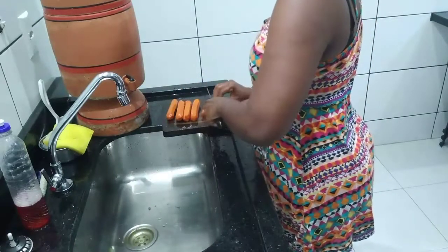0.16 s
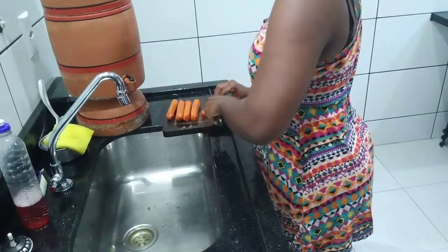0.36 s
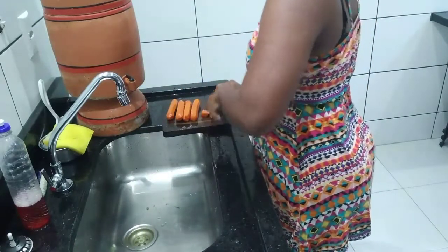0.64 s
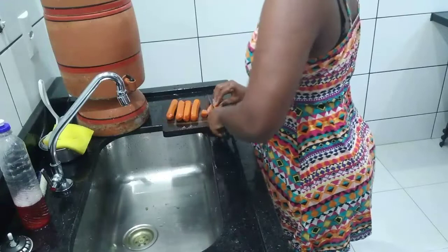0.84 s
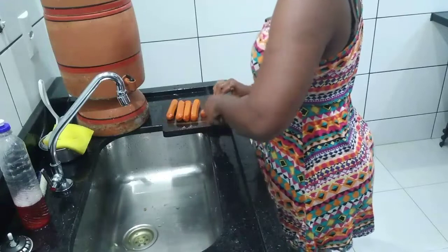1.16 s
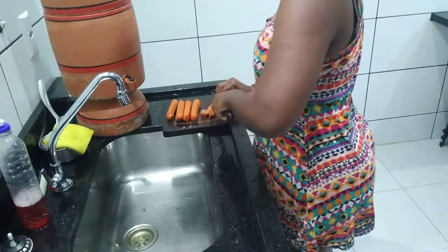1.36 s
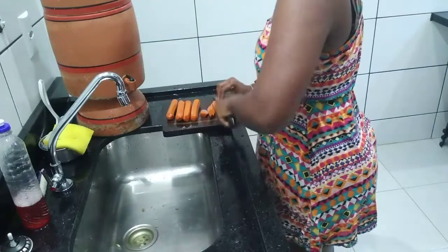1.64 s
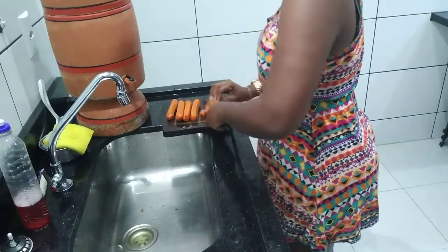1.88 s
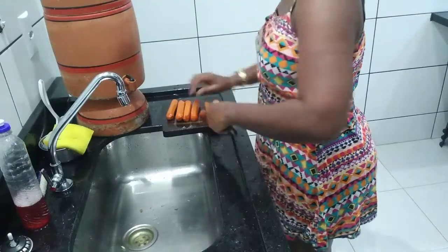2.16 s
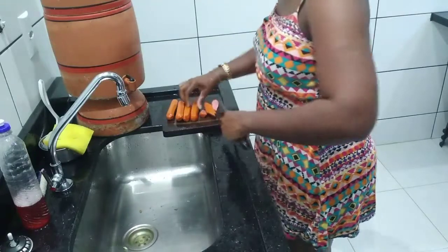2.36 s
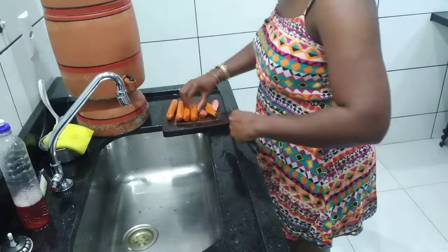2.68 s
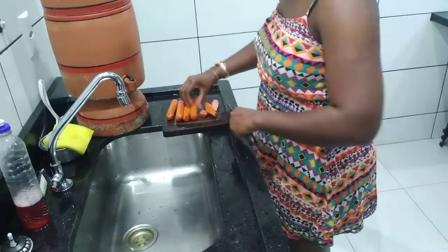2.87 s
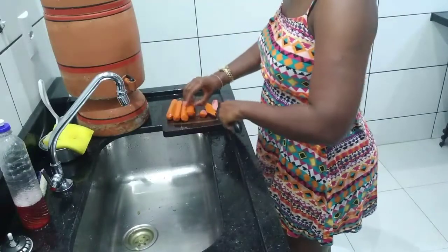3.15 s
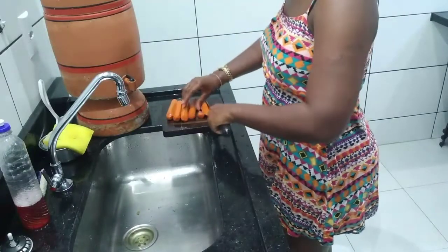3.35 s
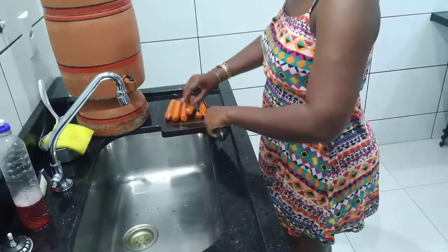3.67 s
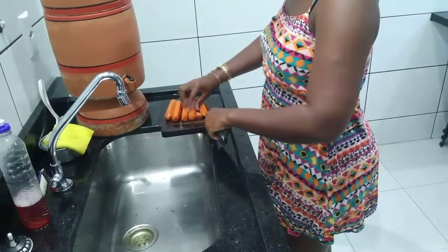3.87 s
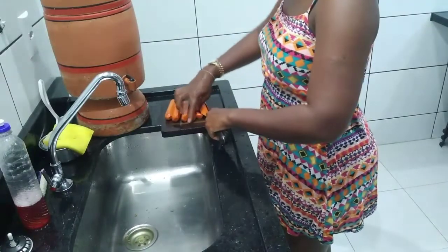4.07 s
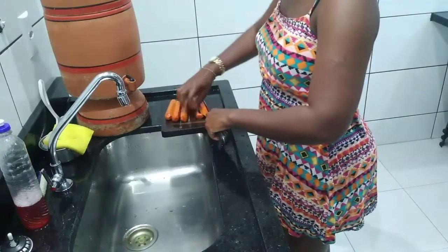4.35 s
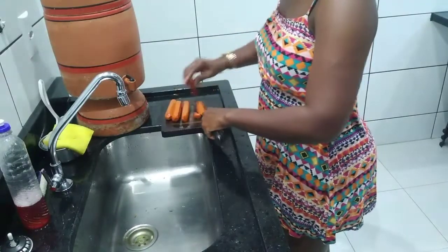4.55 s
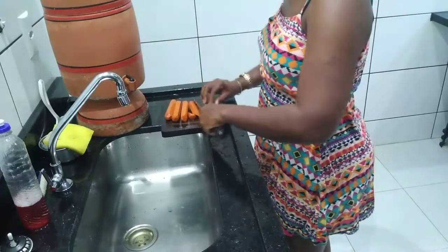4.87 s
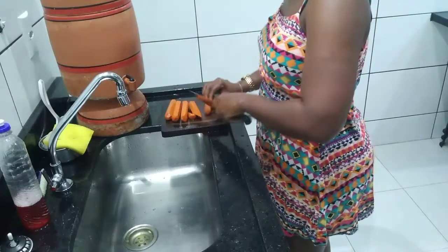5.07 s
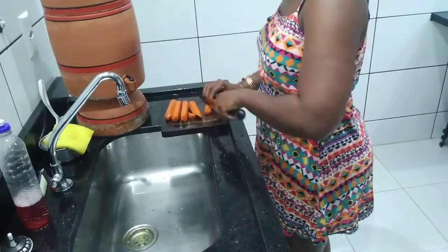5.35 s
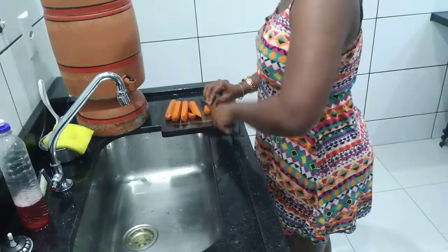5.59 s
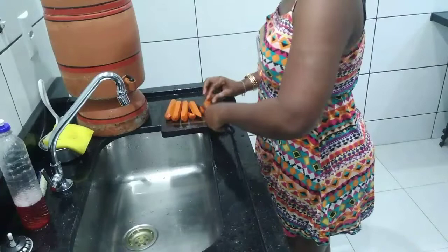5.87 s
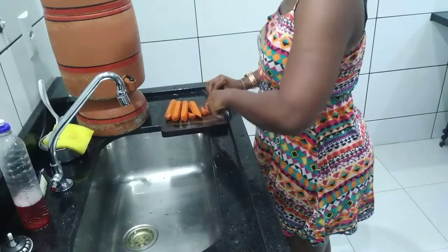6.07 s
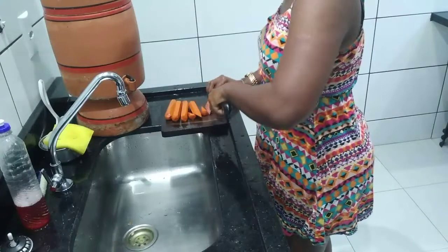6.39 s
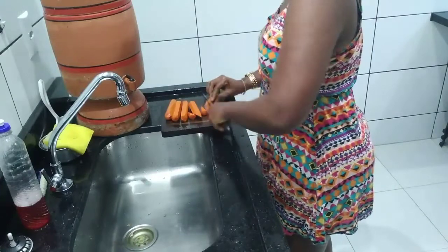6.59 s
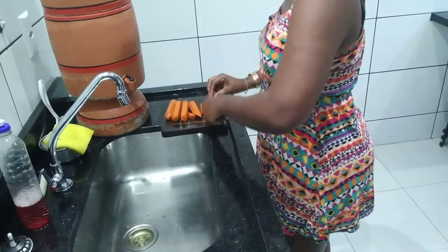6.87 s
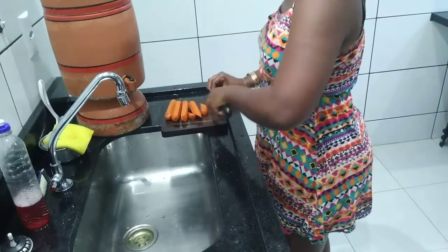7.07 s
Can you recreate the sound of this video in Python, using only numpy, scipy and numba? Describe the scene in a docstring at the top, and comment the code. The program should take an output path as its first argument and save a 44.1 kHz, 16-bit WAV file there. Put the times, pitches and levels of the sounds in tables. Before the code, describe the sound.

A microwave oven runs throughout in a small tiled kitchen: a steady low hum with a prominent midrange fan-blade drone, soft muffled air and hiss, and a faint, unevenly swelling cabinet rumble, stronger on the left. Nearby, a knife meets a cutting board with short, dull, woody knocks. Two quick taps fall around 0.8 seconds, with a weaker thud just after at 0.95. Another tap and a fainter one come at 1.7 to 1.8, with a thin high blade scrape and a brief airy hand swish until about 2.15. Pieces slide with soft, low squeaks from 2.8 to 3.2. Then mostly hum until a short rub at 5.4 and two taps at 5.6. A faint singing scrape starts at 6.2, and a final pair lands near 6.5, its second tap the loudest. The drone strengthens towards 7.2. Phone-microphone stereo, trimmed deep bass, short room tail.

```python
"""Microwave oven and chopping board

Tiled kitchen; the right channel is the left recoloured, delayed, phase-shifted and partly decorrelated.
Behind, an oven: steady sines for mains and fan blades over filtered-noise air and low, narrow rumbles.
Nearby, a knife on a board: taps ring decaying modes; scrapes, slides and a swish are resonant noise."""
import sys
import numpy as np
from scipy import signal
from scipy.fft import rfft, irfft, next_fast_len
from scipy.io import wavfile
from scipy.ndimage import uniform_filter1d
from numba import njit

SR = 44100
rng = np.random.default_rng(int(sys.argv[2]) if len(sys.argv) > 2 else 0)


def dump(signal):
    """Clip the signal to [-1, 1] and save it as 16-bit WAV at the path in sys.argv[1]."""
    limited = np.clip(np.atleast_2d(signal).T, -1, 1)
    pcm = np.round(limited * 32767).astype(np.int16)
    wavfile.write(sys.argv[1], SR, pcm)


def invert_db(level):
    """Linear amplitude ratio for a level in decibels (20 dB per decade), elementwise."""
    return 10 ** (np.asarray(level, dtype=float) / 20)


N = 318754
M = next_fast_len(N)  # working length, for fast transforms
T = np.arange(M) / SR
F = np.fft.rfftfreq(M, 1 / SR)

# cabinet rumble resonances: centre_hz, width_hz (centre to half amplitude), level_db (added to the swell)
RUMBLE_MODES = [(67.5, 5.9, -0.5), (82.8, 6, -1.5), (98.5, 9.5, 0)]
# rumble level over time: time_s, lowest_resonance_db, upper_resonances_db
RUMBLE_SWELL = [(0, -33.5, -56), (.55, -47.5, -48), (.92, -32.5, -54), (1.17, -39.5, -45), (1.35, -36, -42),
                (1.7, -37.5, -50), (1.95, -47, -54), (2.25, -49, -46), (2.6, -36.5, -41.5),
                (3.02, -51, -53), (3.25, -45, -41.5), (3.66, -35, -46), (3.85, -51, -54), (4.08, -41, -40),
                (4.45, -46, -51), (4.8, -30.5, -44), (5.0, -44.5, -43.5), (5.45, -37, -47),
                (5.85, -49, -64), (6.8, -58, -55), (7.05, -45.5, -65), (7.23, -50, -59)]
# colour of air and cabinet noise on the left: frequency_hz, relative_density_db (per Hz)
AIR_COLOUR = [(40, -72), (100, -74), (140, -66.5), (250, -68.5), (290, -58.5), (340, -50.5), (430, -51.5),
              (530, -57), (572, -67.5), (628, -61), (685, -64.5), (742, -58), (800, -65.5), (880, -62.5),
              (1000, -69), (1300, -74.5), (1650, -71), (2100, -76), (6000, -75.5), (9000, -76.5),
              (14000, -87)]
# level of the air's hiss over time: time_s, level_db
HISS_SWELL = [(0, -41.5), (.75, -42.5), (.93, -43.5), (1.2, -41), (1.85, -43), (2.2, -38.5), (2.6, -43),
              (3.0, -40.5), (3.3, -40.5), (3.7, -41.5), (4.75, -41), (4.97, -49.5), (5.25, -41.5),
              (5.75, -44), (6.12, -39.5), (6.45, -40.5), (6.7, -44), (7.23, -40.5)]
# steady lines, mains then fan: left_rms_db, right_minus_left_db, left_lead_rad, waver_db (spread)
HUM_LINES = [(-44, -10, 2.02, 2), (-53.5, -5, 0.44, 3), (-39, -9, 1.1, 2.5), (-35, -6, 1.15, 2),
             (-48, -8, 1.7, 3.5), (-48, -10, .3, 5)]
# second harmonic of the fan blades over time: time_s, left_rms_db
BLADE_SWELL = [(0, -31), (2, -29), (3, -28.5), (3.5, -28.5), (5.3, -28.5), (6, -25), (6.6, -27), (7.1, -22),
               (7.23, -23)]
# right channel against left: frequency_hz, level_db (before shading), lag_rad (beyond the delay), likeness (0-1)
STEREO_RESPONSE = [(60.4, 4, 1.8, 0.89), (117, 1.5, 1.7, 0.87), (217, -2.5, 0, 0), (288, -7, -0.3, 0.64),
                   (377, -5, -1.1, 0.95), (444, -4.5, 0.78, 0.75), (570, -4.5, 0.5, 0.43),
                   (650, -8, -1.5, 0.52), (893, 0, -2.5, 0.61), (950, -7.5, -2.5, 1), (1170, 1.5, -3, 0.89),
                   (1730, -0.5, -3.5, 0.17), (2137, 0, -2.5, 1), (2150, 7, -3, 1), (2610, 0.5, -3.5, 0.95),
                   (2980, -0.5, -3, 1), (3400, -2.5, -2.5, 0.84), (3750, -0.5, -3.5, 0.6),
                   (4260, -1.5, -3, 0.76), (6700, 0.5, -3.5, 0.55), (9170, 0.5, -2.5, 0.16),
                   (12000, 8, -3.5, 0)]
# pieces slide and squeak: start_s, length_s, level_db, first_hz, target_hz
SLIDE_STROKES = [(2.84, .26, -33.5, 835, 990), (3.11, 0.13, -36.5, 980, 986), (5.43, 0.13, -35, 655, 653)]
# a hand swishes: start_s, length_s, level_db, first_hz, target_hz
SWISH_STROKES = [(1.91, .24, -32, 6160, 5560)]
# the blade sings along the board: start_s, length_s, level_db, first_hz, target_hz
SCRAPE_STROKES = [(1.73, .3, -35.5, 3680, 3720), (6.21, 0.37, -34.5, 3400, 3610)]
# counter modes under the board: frequency_hz, level_db (relative), t60_s
COUNTER_MODES = [(130, -18, 0.03), (200, -5.5, 0.036), (290, -5.5, 0.04), (432, 0.5, 0.067),
                 (505, -2.5, 0.099)]
# board modes: frequency_hz, level_db (relative), t60_s
BOARD_MODES = [(626, -4, 0.053), (720, -5, 0.043), (865, -15, .04), (933, 0.5, 0.064), (965, -18, 0.23),
               (1024, -4, 0.058), (1560, -8.5, 0.04)]
# knife taps: start_s, level_db, upper_modes_db, thump_db, tick_db (last three within the tap), rise_s
KNIFE_TAPS = [(0.752, -14.5, -5, -4, -23, 0.0016), (.825, -15.5, -8, -4.5, -13, 0.0017),
              (.949, -25.5, -5, 5, -23, .001), (1.712, -16, -8, -7.5, -22, 0.001),
              (1.783, -24, -5, -15, -19, .001), (5.578, -17, -1, -2.5, -12, 0.0012),
              (5.638, -13.5, 1.5, -0.5, -23, 0.001), (6.513, -18, -2, -4, -22, 0.0012),
              (6.583, -10, -1, -4, -25, 0.002)]

MAINS_HZ, FAN_HZ = 60, 171.0
RIGHT_LAG_S = 0.000442
KITCHEN_T60_S, KITCHEN_DB = 0.18, -13
UPPER_FROM_HZ = 1000  # each tap's upper_modes_db applies to board modes above this
TOP_HZ = 14230


def by_hz(table, column):
    """A table column read along a log-frequency axis."""
    table = np.array(table)
    return np.interp(np.log(F + 1), np.log(table[:, 0]), table[:, column])


def over_time(table, column=1):
    """A table column read along time."""
    columns = np.transpose(table)
    return np.interp(T, columns[0], columns[column])


def unit(x):
    """Scale to rms 1."""
    return x / np.sqrt(np.mean(x ** 2))


def walk(rate):
    """Random levels held 1 / rate s and slewed twice; rms 1."""
    hold = int(SR / rate)
    steps = np.repeat(rng.standard_normal(M // hold + 1), hold)
    return unit(uniform_filter1d(uniform_filter1d(steps, hold), hold)[:M])


def noise(colour):
    """Two unrelated noises of one amplitude spectrum, rms 1 over the pair."""
    real = rng.standard_normal((2, len(F)))
    imaginary = rng.standard_normal((2, len(F)))
    return unit(irfft(colour * (real + 1j * imaginary), M))


@njit
def svf(x, hz, width):
    """State-variable band-pass with a moving centre, gain 1 there."""
    y, band, low = np.empty(len(x)), 0., 0.
    for i in range(len(x)):
        g, k = np.tan(np.pi * hz[i] / SR), width / hz[i]
        v = (band + g * (x[i] - low)) / (1 + g * (g + k))
        band, low, y[i] = 2 * v - band, low + 2 * g * v, k * v
    return y


def pseudo_stereo(direct, diffuse, shade=0.97):
    """Left is the sound as is; right is shaded, delayed, phase-shifted and partly replaced by unrelated sound."""
    like = np.clip(by_hz(STEREO_RESPONSE, 3), 0, 1)
    lag = by_hz(STEREO_RESPONSE, 2) + 2 * np.pi * F * RIGHT_LAG_S
    shift = invert_db(shade * by_hz(STEREO_RESPONSE, 1)) * np.exp(-1j * lag)
    mixed = like * rfft(direct) + np.sqrt(1 - like ** 2) * rfft(diffuse)
    return np.array([direct, irfft(shift * mixed, M)])


def rumble():
    """Narrow noise around each cabinet resonance, wandering in level; the upper two swell together."""
    out = np.zeros((2, M))
    for (hz, width_hz, db), column in zip(RUMBLE_MODES, (1, 2, 2)):
        resonance = 1 / (1 + ((F - hz) / width_hz) ** 2)
        out += noise(resonance) * invert_db(db + over_time(RUMBLE_SWELL, column) + 1.2 * walk(6))
    return out


def fan_air():
    """Fan air as coloured noise, its power split into a near-steady body and a hiss that swells on its own."""
    colour = invert_db(by_hz(AIR_COLOUR, 1))
    hiss_share = 1 / (1 + (9000 / (F + 1)) ** 4.0)  # of the power, half at 9 kHz
    body = noise(colour * np.sqrt(1 - hiss_share)) * invert_db(-26.5 + 0.57 * walk(5.4))
    hiss = noise(colour * np.sqrt(hiss_share)) * invert_db(over_time(HISS_SWELL) + 2.1 * walk(18))
    return body + hiss


def tone(hz, db, right_db, lead, waver_db):
    """A nearly steady line whose level and phase wander at random."""
    phase = 2 * np.pi * hz * T + 0.36 * walk(3.16)
    size = np.sqrt(2) * invert_db(db + waver_db * walk(12))
    return size * np.array([np.sin(phase), invert_db(right_db) * np.sin(phase - lead)])


def hum():
    """Lines at multiples of the mains and of the fan blades, each with its own left-right balance."""
    line_hz = [k * MAINS_HZ for k in (2, 4, 6)] + [k * FAN_HZ for k in (1, 3, 5)]
    lines = sum(tone(hz, *row) for hz, row in zip(line_hz, HUM_LINES))
    return lines + tone(2 * FAN_HZ, over_time(BLADE_SWELL), right_db=-13, lead=0.65, waver_db=1.7)


def oven():
    """The hum plus air and rumble, which are partly alike left and right."""
    return hum() + pseudo_stereo(*(fan_air() + rumble()))


def rub(strokes, width_hz, body_db, grain_db, peak, fall_db, glide):
    """Grainy friction noise through a gliding resonance with a broader body.

    peak and glide are shares of the stroke; fall_db is the drop from peak to end."""
    out, grain = np.zeros(M), invert_db(grain_db * walk(45))
    for s, length, db, first_hz, target_hz in strokes:
        span = slice(int(s * SR), int((s + length) * SR))
        u = (T[span] - s) / length  # progress through the stroke, 0-1
        hz = target_hz + (first_hz - target_hz) * np.exp(-u / glide)
        body = svf(rng.standard_normal(len(u)), hz, 6.0 * width_hz)
        ring = svf(svf(body, hz, 1. * width_hz), hz, 1. * width_hz)
        friction = unit(ring) + invert_db(body_db) * unit(body)
        edge = np.clip(np.minimum(u, 1 - u) * length / 0.016, 0, 1)  # 16 ms ramps
        swell = invert_db(db - np.interp(u, [0, peak, 1], [12.5, 0, fall_db]))
        out[span] += friction * edge * swell * grain[span]
    return out


def slides():
    """Pieces slide and squeak: friction through a narrow resonance."""
    return rub(SLIDE_STROKES, width_hz=58, body_db=-1.5, grain_db=2.1, peak=0.3, fall_db=6.7, glide=0.73)


def swish():
    """A hand swishes: friction through a very broad, high resonance."""
    return rub(SWISH_STROKES, width_hz=2900, body_db=-1.6, grain_db=1.3, peak=0.27, fall_db=15, glide=0.2)


def scrapes():
    """The blade sings along the board: friction through a high resonance."""
    return rub(SCRAPE_STROKES, width_hz=230, body_db=-0.67, grain_db=0.97, peak=0.23, fall_db=16, glide=0.11)


def ring_mode(t, hz, db, t60):
    """A struck mode: a sine that decays by 60 dB in t60 seconds."""
    return invert_db(db) * np.sin(2 * np.pi * hz * t) * np.exp(-np.log(1000) * t / t60)


def taps():
    """Each blow rings the board's modes in fresh proportions, thumps the counter and ticks the blade."""
    out, t = np.zeros(M), T[:SR // 5]
    thump = sum(ring_mode(t, *mode) for mode in COUNTER_MODES)
    for s, db, upper_db, thump_db, tick_db, rise in KNIFE_TAPS:
        board = np.zeros(len(t))
        for hz, mode_db, t60 in BOARD_MODES:
            struck_db = mode_db + 2.1 * rng.standard_normal() + upper_db * (hz > UPPER_FROM_HZ)
            board += ring_mode(t, hz, struck_db, t60)
        board *= 1 - np.exp(-t / rise)  # contact softens the onset
        tick = rng.standard_normal(len(t)) * np.exp(-t / 0.0077)
        i = int(s * SR)
        out[i:i + len(t)] += invert_db(db) * (board + invert_db(thump_db) * thump + invert_db(tick_db) * tick)
    return out


def kitchen(board):
    """The tiled room's short tail: two unrelated decaying noises, silent for the first 4 ms."""
    t = T[:SR // 3]
    tails = rng.standard_normal((2, len(t))) * np.exp(-np.log(1000) * t / KITCHEN_T60_S) * (t > .004)
    tails = tails / np.sqrt(np.sum(tails ** 2, axis=1, keepdims=True))
    return [signal.fftconvolve(board, tail)[:M] for tail in tails]


def scene():
    """The oven behind, the board nearby with the room's tail."""
    behind = oven()
    board = slides() + swish() + scrapes() + taps()
    wet, other = kitchen(board)
    # a small shade keeps the board's right channel barely recoloured
    near = pseudo_stereo(board + invert_db(KITCHEN_DB) * wet, invert_db(-3.5) * other, shade=0.084)
    return (behind + near)[:, :N]


def low_pass(x):
    """Removes everything above the highest recorded frequency."""
    return signal.sosfilt(signal.butter(12, 14890, fs=SR, output="sos"), x)


def record(dry):
    """The phone's microphone path cuts the deepest bass and the top."""
    bass_cut = signal.butter(4, 50, "high", fs=SR, output="sos")
    top_cut = signal.ellip(14, .5, 70, TOP_HZ, fs=SR, output="sos")
    mix = signal.sosfilt(top_cut, signal.sosfilt(bass_cut, dry))
    return low_pass(mix)


dry = scene()
out = record(dry)
dump(out)
```